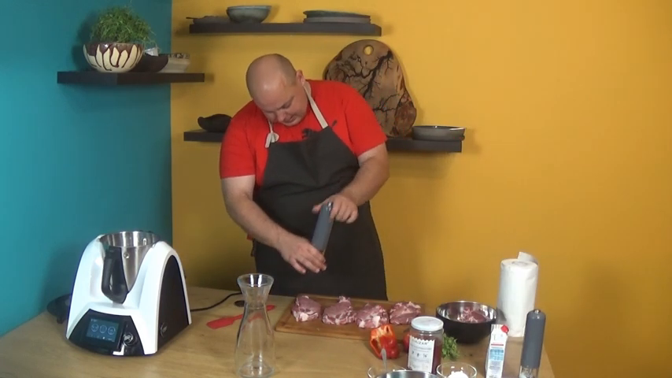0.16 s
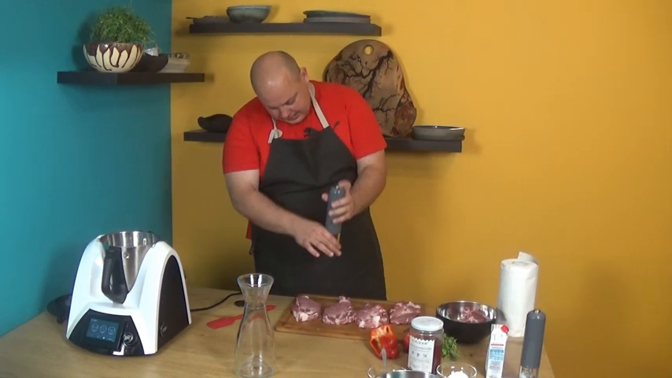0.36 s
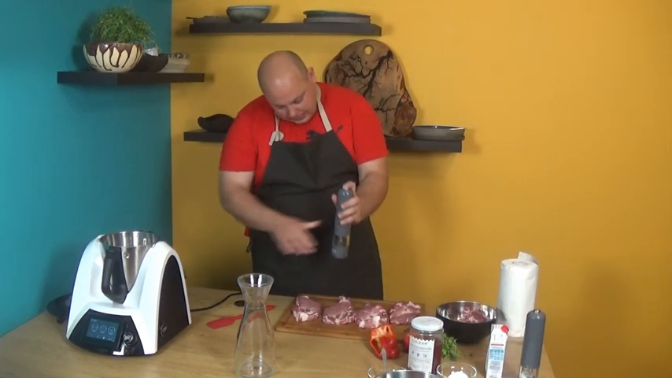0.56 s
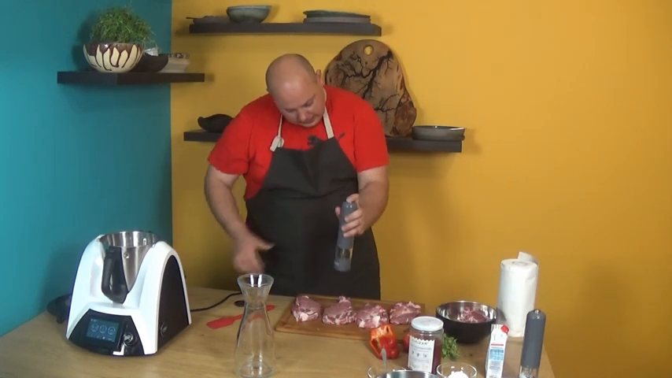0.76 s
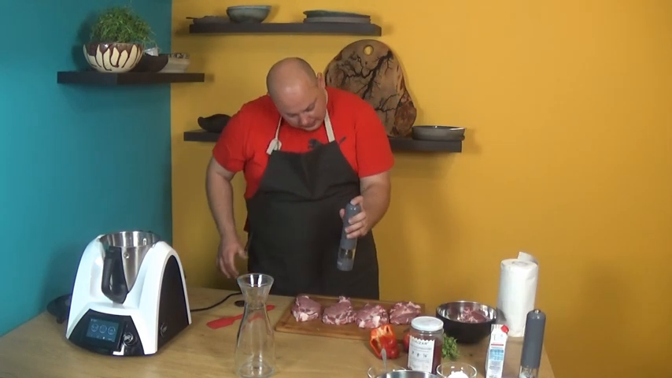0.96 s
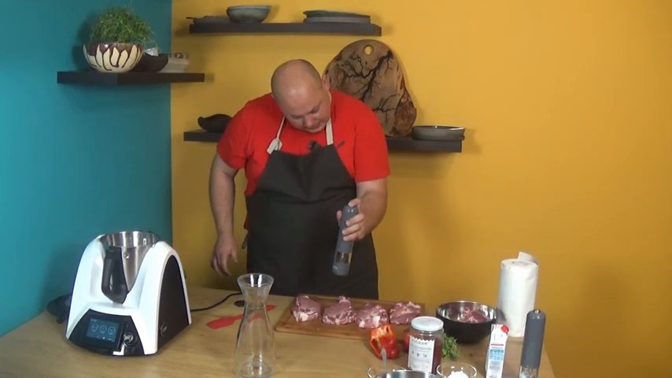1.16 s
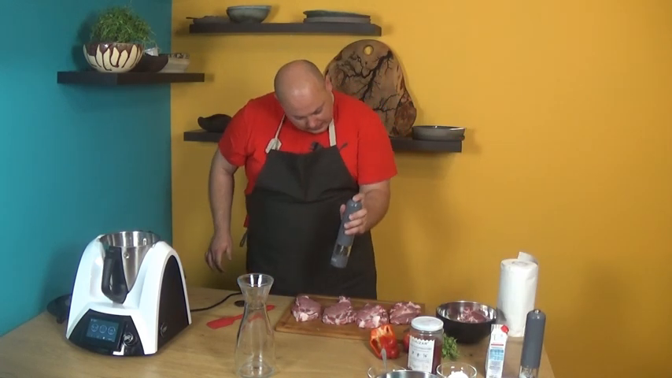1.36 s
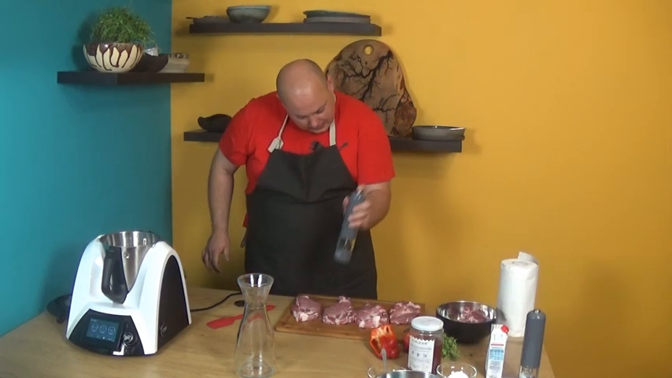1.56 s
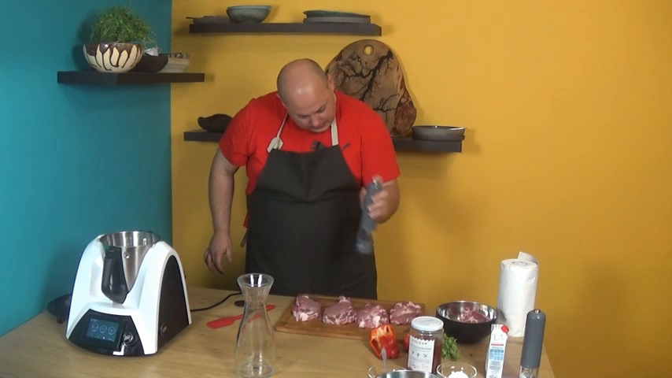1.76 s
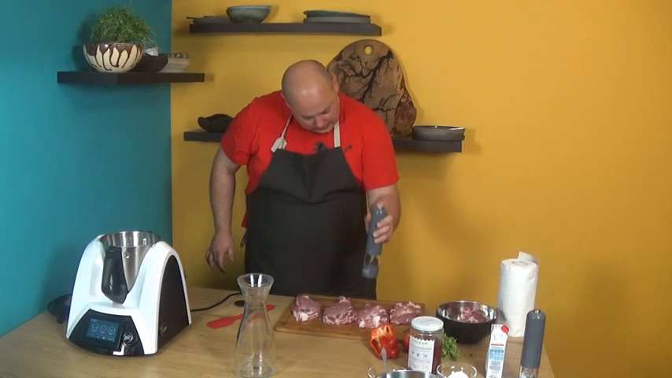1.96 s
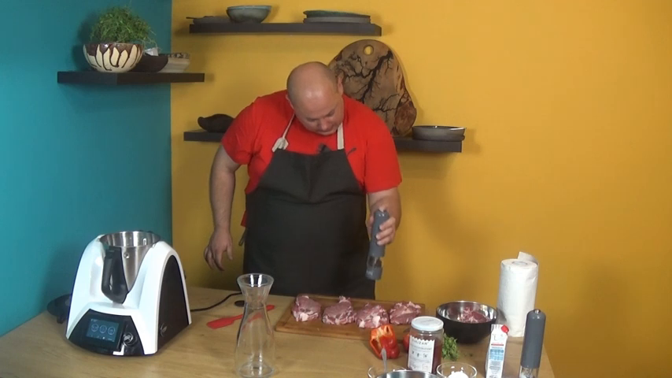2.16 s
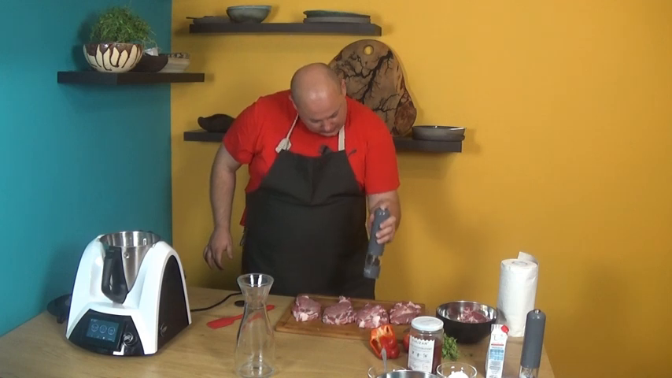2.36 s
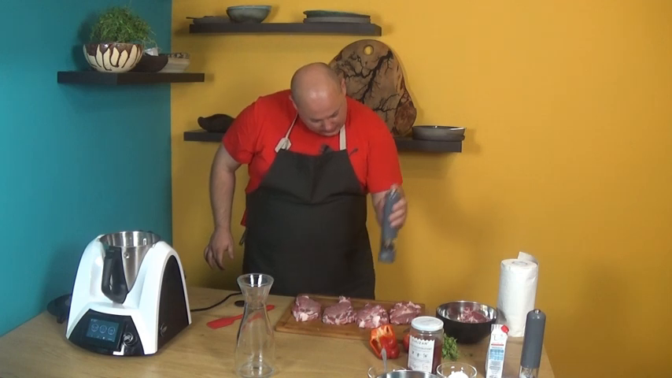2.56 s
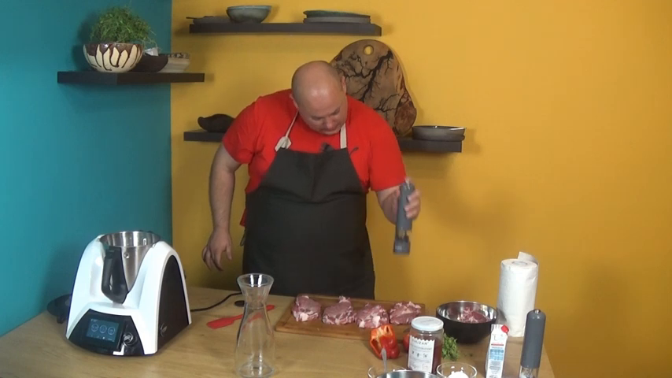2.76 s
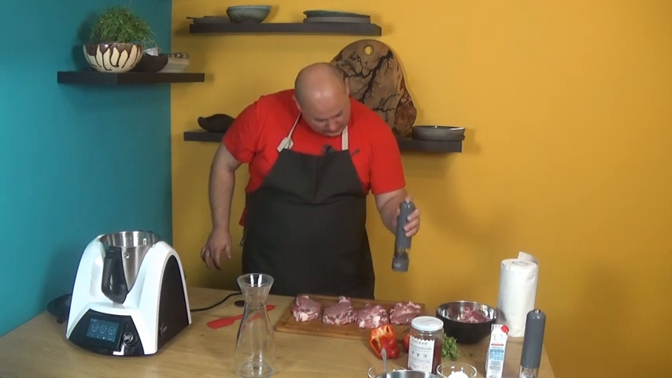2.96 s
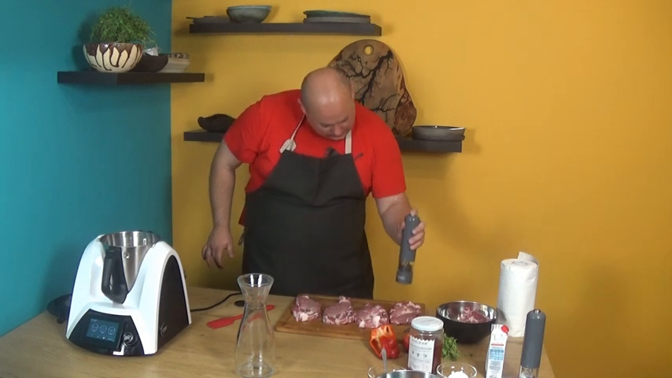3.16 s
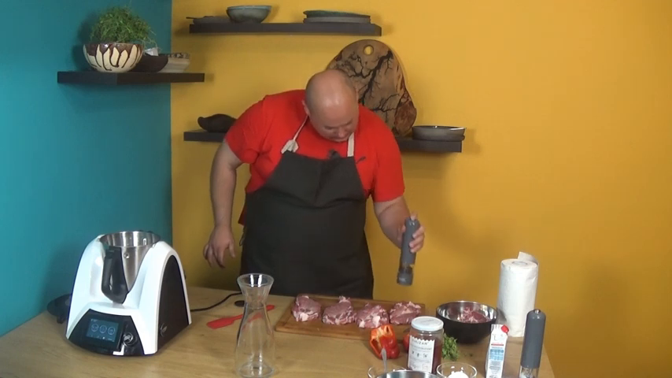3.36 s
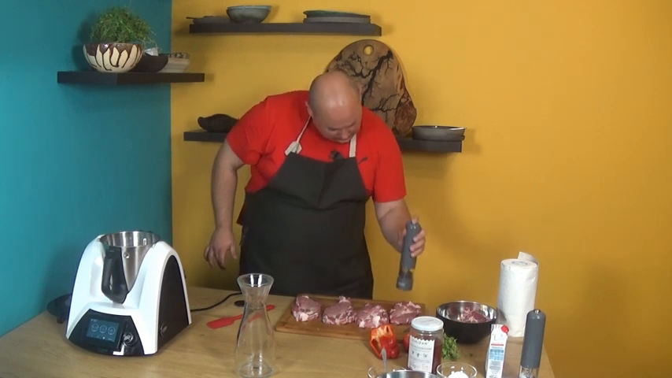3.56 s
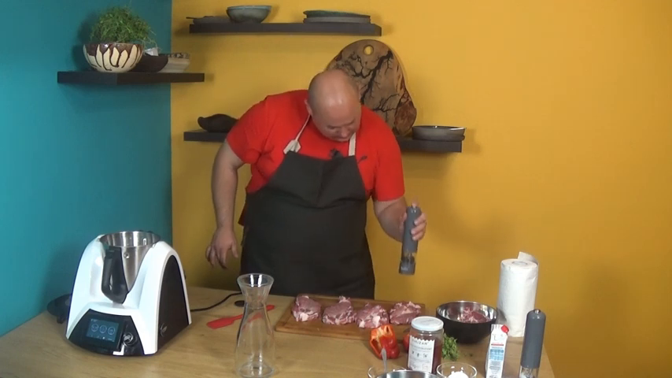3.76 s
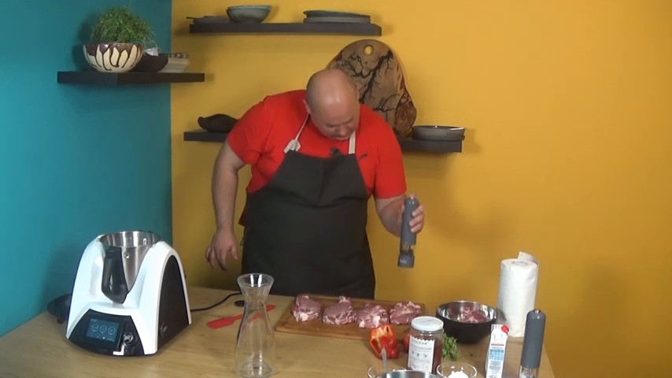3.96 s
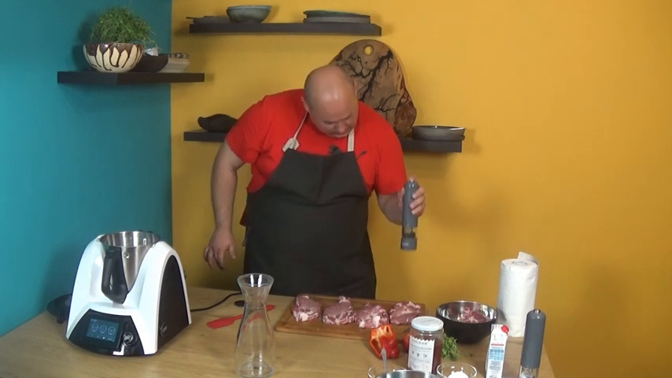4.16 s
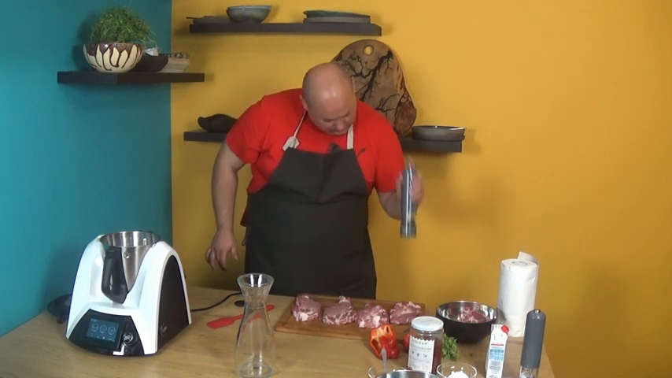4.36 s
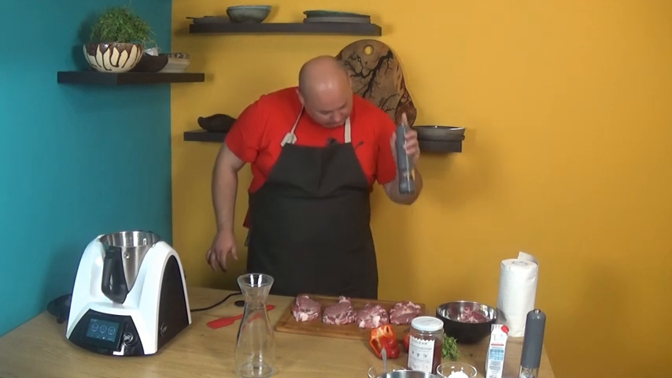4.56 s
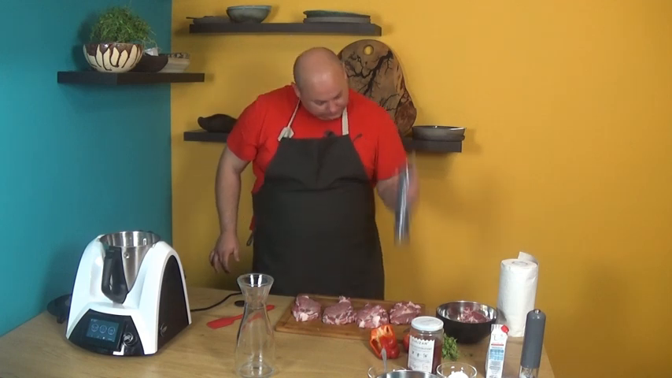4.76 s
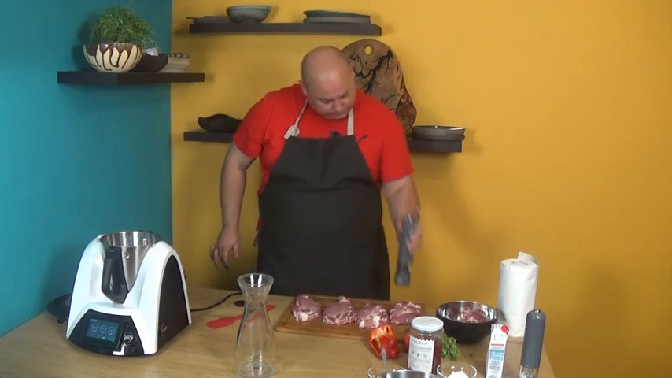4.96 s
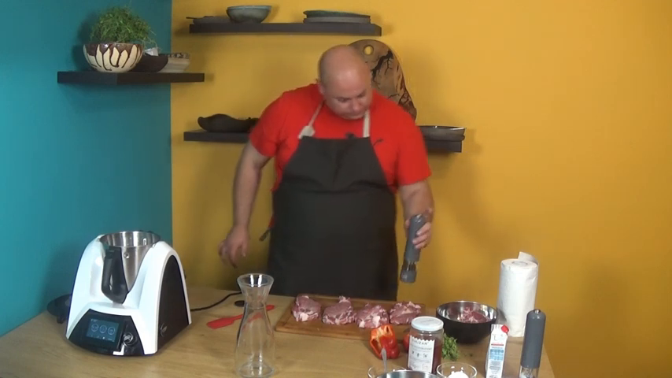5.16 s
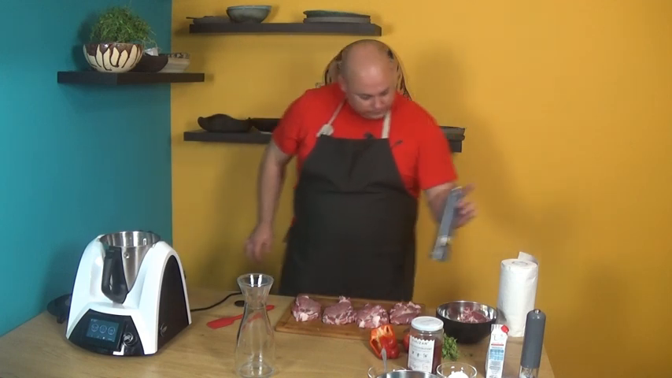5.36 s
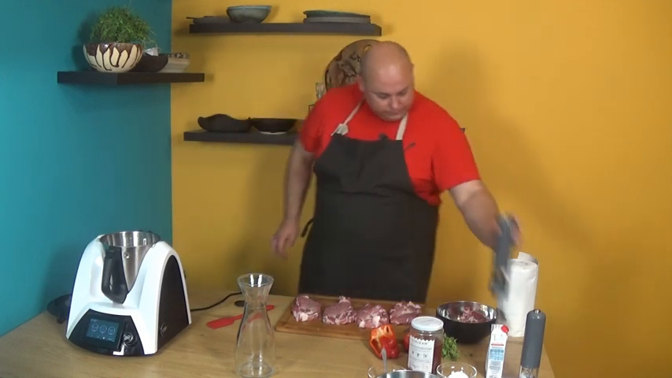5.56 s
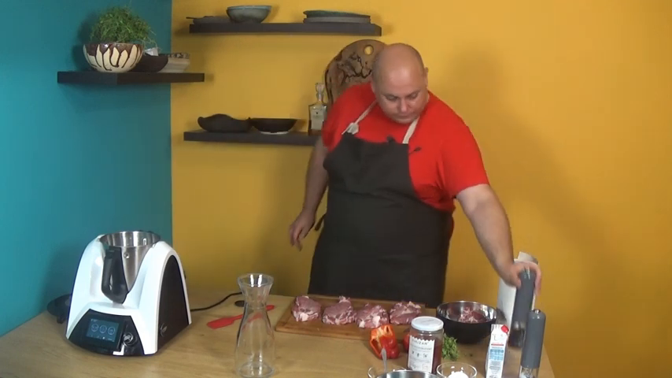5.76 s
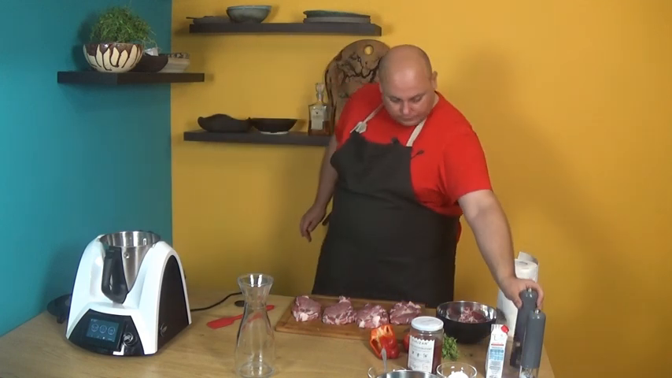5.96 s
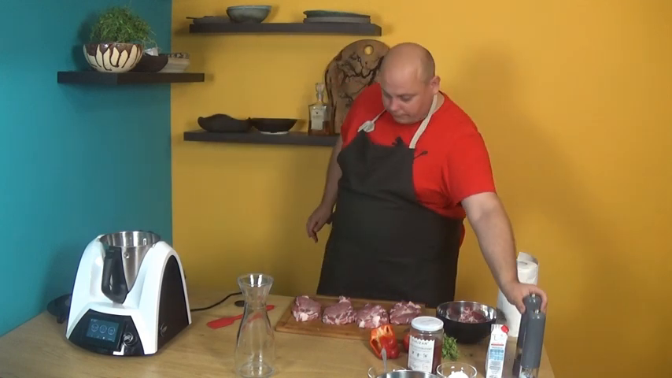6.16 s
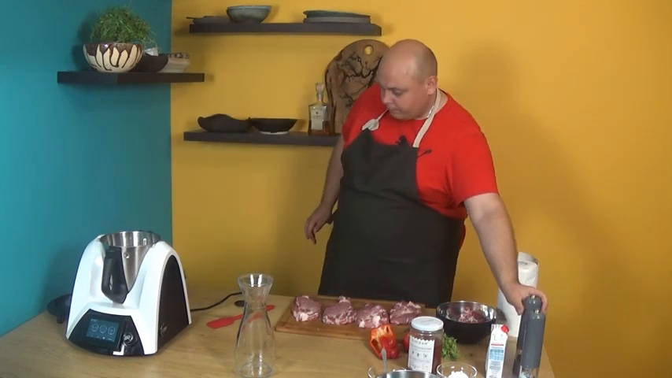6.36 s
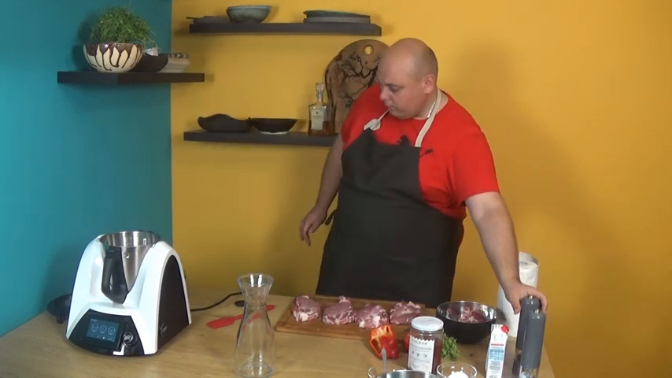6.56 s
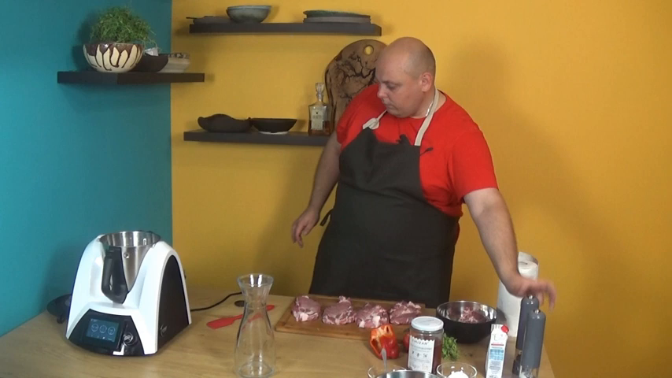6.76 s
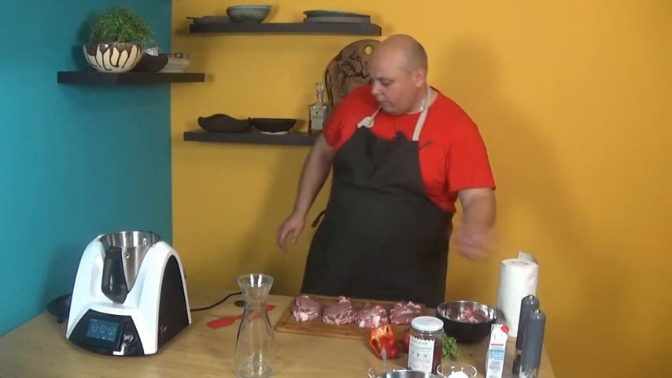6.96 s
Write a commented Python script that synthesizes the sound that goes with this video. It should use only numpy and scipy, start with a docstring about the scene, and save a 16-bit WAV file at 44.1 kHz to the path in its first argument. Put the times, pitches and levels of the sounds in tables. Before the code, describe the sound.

In a kitchen with a short reverberation, an electric spice grinder is heard from a few metres away. It whirs and crunches three times, the last two runs almost joined, with corns snapping in the burrs. Then come a quick rattling shake, several sharp plastic clicks and a knock as the grinder lands on the counter and rocks once. Light handling and one more click close it, over faint hiss.

```python
"""A brief scrape of grit, then a small battery spice mill whines and crunches through three bursts,
over a kitchen counter a few metres from the microphone. Its three-pole motor and pinion sing under the
hiss of corns breaking in the burrs; then it is shaken, clicked and set down. The counter returns early
echoes, the room a short tail; a faint hiss, a thin whistle and a quick tick lie under it all."""
import sys
import numpy as np
from scipy import signal
from scipy.fft import rfft, irfft, next_fast_len
from scipy.io import wavfile
from scipy.ndimage import uniform_filter1d

SR = 44100
rng = np.random.default_rng(int(sys.argv[2]) if len(sys.argv) > 2 else 0)


def unload_wav(signal):
    """Save mono or channel-first audio to the path in sys.argv[1] as 16-bit WAV at rate SR, clipped to [-1, 1]."""
    wavfile.write(
        sys.argv[1],
        SR,
        np.round(np.clip(np.atleast_2d(signal).T, -1, 1) * 32767).astype(np.int16),
    )


N = 312669
T = np.arange(N) / SR
FFT_SIZE = next_fast_len(N + SR)
HZ = np.maximum(np.arange(FFT_SIZE // 2 + 1) * SR / FFT_SIZE, 1)

# The shaft spins up, labours under the corns and runs down: t/s, f/Hz
SHAFT_SPEED = [(0.53, 140), (0.63, 189), (0.69, 225), (0.8, 210), (0.89, 210), (0.95, 224), (1.03, 226),
               (1.07, 240), (1.17, 245), (1.37, 238), (1.42, 199), (1.52, 138), (1.72, 141), (1.81, 195),
               (1.95, 241), (2.0, 256), (2.22, 277), (2.37, 268), (2.52, 194), (2.62, 150), (2.68, 180),
               (2.76, 198), (2.82, 218), (2.93, 216), (3.0, 245), (3.08, 251), (3.17, 247), (3.3, 260),
               (3.4, 244), (3.44, 230), (3.5, 232), (3.58, 251), (3.69, 244), (3.84, 219), (3.92, 231),
               (3.99, 231), (4.05, 211), (4.2, 210), (4.27, 149)]
# Button presses: start t/s, end t/s, then level/dB of poles, pinion, chatter (table levels are relative)
PRESSES = [(0.57, 1.5, -61, -42, -50), (1.69, 2.63, -59.5, -53.5, -51), (2.627, 4.268, -58, -44.5, -50.5)]
# Tones of three poles, eleven teeth and uneven teeth: multiple of the shaft rate, level/dB
POLE_TONES = [(2, -17), (3, 1.5), (6, 2.5)]
PINION_TONES = [(11, -5), (22, 3)]
CHATTER_TONES = [(8, -13.5), (9, -14), (10, -4.5), (14, 2), (15, 5), (17, 3.5), (21, -3.5)]
# Resonances that each set of tones sweeps through: f/Hz, width/Hz, lift/dB
CASING_MODES = [(739.5, 43, 13.5), (774, 63, 8)]
SEAT_MODES = [(2198, 440, 19.2), (2584, 114, 10.7), (2758, 210, 10.7), (2966, 130, 7.4)]
GEARBOX_MODES = [(2260, 64, -4), (2480, 180, -12), (3180, 140, 11), (4700, 180, -10.5)]
def motor(switch_s=0.025, full_hz=243, waver_db=3):
    """Shaft harmonics grow with speed and swell as they cross resonances. Returns whine, shaft angle."""
    shaft_hz = curve(SHAFT_SPEED, 1)
    unsteady_hz = shaft_hz * (1 + 0.003975 * walk(60) + .006 * walk(12))
    angle = 2 * np.pi * np.cumsum(unsteady_hz) / SR
    speed_gain = undb(6 * np.log2(shaft_hz / full_hz))  # 6 dB per octave
    parts = (POLE_TONES, CASING_MODES), (PINION_TONES, SEAT_MODES), (CHATTER_TONES, GEARBOX_MODES)
    whine = 0
    for column, (tones, modes) in enumerate(parts, start=2):
        pressed = sum(undb(row[column]) * (T > row[0]) * (T < row[1]) for row in PRESSES)
        gain = uniform_filter1d(pressed, int(switch_s * SR)) * speed_gain
        for order, db in tones:
            tone_db = db + lift_db(order * shaft_hz, modes) + waver_db * walk(14)
            whine = whine + np.sqrt(2) * gain * undb(tone_db) * np.sin(order * angle)
    return whine, angle


# The opening scrape and the long grind, one list each: t/s, level/dB, extra treble level/dB
GRIND_RUNS = [
    [(0.0, -22, -13), (0.14, -101, 19)],
    [(0.4, -54.5, 0), (0.45, -51.5, -3), (0.5, -33, -8), (0.63, -28.5, 3.5), (0.87, -25, 4), (0.93, -27, 1),
     (1.39, -25.5, 3), (1.46, -30.5, 0), (1.67, -39.5, -13), (1.75, -28.5, -1), (1.93, -27, -3),
     (2.24, -28.5, 0), (2.28, -27.5, 1), (2.58, -35, -6.5), (2.65, -30, -6), (2.72, -25.5, 1.5),
     (2.81, -28.5, 0.5), (2.9, -24, 2.5), (2.97, -28.5, -4), (3.13, -25.5, 0.5), (3.2, -28.5, -0.5),
     (3.42, -23.5, -1.5), (3.56, -27, -0.5), (3.79, -23.5, 0), (3.88, -25, -1), (4.1, -25.5, 3.5),
     (4.25, -26.5, -3), (4.34, -37, -14), (4.42, -72, -11)],
]
# Spectrum of grit in the burrs: f/Hz, level/dB
GRIT_SPECTRUM = [(150, -56), (300, -53), (600, -23.5), (1000, -19.5), (1500, -11.5), (2050, -5.5),
                 (2400, -2), (3370, -1), (4430, -3.5), (6760, -1.5), (7830, -2.5), (9230, 0.5),
                 (11300, -10), (16000, -34)]
# Resonances of the mill's shell: f/Hz, width/Hz, lift/dB
SHELL_MODES = [(1663, 120, 7.5), (2130, 120, 4), (2580, 140, -3), (3530, 76, 5), (5200, 1000, 2.5),
               (6800, 240, 5), (9500, 500, 2.5)]
def burrs(angle, split_hz=7400):
    """Grit, pulsing with the shaft, rings the shell; the treble follows its own level."""
    out = 0
    for side, columns in (("low", [1]), ("high", [1, 2])):
        grit = level(grains(9000, spread_db=4.0), 0)
        pulsing = grit * (1 + 0.21 * np.cos(angle)) * undb(1.5 * walk(34.8))
        crossover = signal.butter(4, split_hz, side, fs=SR, output="sos")
        part = signal.sosfilt(crossover, colour(pulsing, GRIT_SPECTRUM, SHELL_MODES))
        envelope = sum(undb(sum(curve(run, c, outside=-104) for c in columns)) for run in GRIND_RUNS)
        out = out + level(part, -4.5) * envelope
    return out


# Corns breaking in the burrs: t/s, crunch level/dB, knock level/dB
CORN_CRACKS = [(0.5073, -23, -78), (0.889, -18, -37), (1.1294, -25, -53), (1.3932, -30, -39),
               (1.4798, -13.5, -58), (1.759, -21, -57), (1.9114, -12, -40), (2.7244, -11, -39),
               (2.7824, -14, -30), (2.9097, -14.5, -61), (3.1447, -11.5, -45.5), (3.2485, -15.5, -38.5),
               (3.6012, -10.5, -42), (3.9383, -15.5, -47)]
def cracking_corns():
    """Each corn breaks with a wide crunch and knocks the shell."""
    out = np.zeros(N)
    for (s, db, knock_db), noise in zip(CORN_CRACKS, rng.standard_normal((len(CORN_CRACKS), 2, 4000))):
        crunch = burst(noise[0], hz=3340, width=5100, decay_s=0.0058, db=db - 7.5)
        knock = burst(noise[1], hz=777, width=390, decay_s=0.0029, db=knock_db)
        add(out, s, crunch + knock)
    return out


# The shell sings as the grip changes: t/s, length/s, f/Hz, level/dB
SINGING_SPELLS = [(0.634, 0.12, 2160, -50), (0.66, 0.55, 2430, -38.5), (0.792, 0.075, 4830, -32),
                  (0.95, 0.45, 3390, -40), (1.27, 0.063, 5200, -30), (.9, .35, 5300, -39),
                  (1.789, 0.11, 5230, -37.5), (1.804, 0.84, 2150, -44), (2.28, .1, 5200, -47),
                  (2.714, .37, 2212, -40.5), (2.772, 0.11, 3395, -35), (3.36, .12, 3360, -41),
                  (3.7, 0.28, 3330, -42), (3.702, 0.15, 2416, -38), (4.054, 0.21, 2187, -53)]
def singing_shell(waver_db=1.5):
    """Chatter excites narrow modes of the shell; each spell swells and fades."""
    out = 0
    for s, length, hz, db in SINGING_SPELLS:
        tone = double_band(rng.standard_normal(N), hz, width=.024 * hz)
        progress = np.clip((T - s) / length, 0, 1)
        swell = np.sqrt(np.sin(np.pi * progress).clip(0))
        out = out + level(tone, db) * swell * undb(waver_db * walk(12))
    return out


# Flicks of the wrist: peak t/s, level/dB, rise/(dB/s), fall/(dB/s)
FLICKS = [(4.662, -38, 222, 207), (4.728, -27, 612, 700), (4.756, -38, 1500, 500), (4.904, -31.5, 184, 159),
          (5.19, -63, 100, 200), (5.68, -60, 136, 208)]
# Spectrum of the loose corns: f/Hz, level/dB
RATTLE_SPECTRUM = [(150, -69), (250, -47), (429, -21.5), (890, -39), (1700, -17), (2090, -16.5),
                   (2360, -8.5), (2670, -4.5), (4650, -8.5), (5730, -2), (7310, -7), (9660, 1.5),
                   (16000, -29)]
def shaken_corns():
    """Each flick throws the corns against the hollow store."""
    throws = sum(undb(db - np.where(T < s, rise * (s - T), fall * (T - s)))
                 for s, db, rise, fall in FLICKS)
    rattle = colour(grains(4000, spread_db=5.5), RATTLE_SPECTRUM)
    return level(rattle, 0) * throws


# Soft bumps, and two sharp clicks near the end: t/s, level/dB, f/Hz, decay/s
HANDLING_NOISES = [(0.224, -38, 1350, 0.012), (.384, -39, 1290, 0.008), (.463, -28, 3000, 0.021),
                   (4.73, -32, 2400, 0.013), (4.864, -25.5, 2800, 0.015), (5.012, -41, 630, 0.0092),
                   (5.539, -41, 520, 0.0071), (6.413, -42, 557, 0.0089), (6.443, -50, 573, 0.0064),
                   (6.696, -42, 2660, 0.011), (6.73, -50, 2370, .006), (6.907, -35, 2440, 0.0036),
                   (6.967, -34.5, 9500, .004), (6.99, -19.5, 4700, 0.0026), (6.992, -37.5, 1770, 0.032),
                   (7.034, -34, 2900, 0.0076)]
def handling():
    """Small handling noises, each a quickly dying band of noise."""
    out = np.zeros(N)
    for s, db, hz, decay_s in HANDLING_NOISES:
        add(out, s, burst(rng.standard_normal(4000), hz, 0.79 * hz, decay_s, db - 12.5))
    return out


# Sharp clicks of the mill in the hand: t/s, level/dB, tilt/(dB/octave)
PLASTIC_CLICKS = [(0.205, -42, 8), (0.2194, -40, -4), (4.7557, -13.5, 4), (5.2143, -9, -1),
                  (5.2689, -11.5, -1), (5.316, -17.5, -2.5), (5.707, -8, 1.5), (6.9925, -36, -7)]
# Spectrum of a click before its tilt: f/Hz, level/dB
SNAP_SPECTRUM = [(240, -46), (400, -25), (1270, -21), (1730, -12), (2400, -12.5), (3990, -4), (5350, 0),
                 (9920, -10), (14800, -20), (16000, -22)]
def clicks(sweep_s=.0012, buzz_db=-12, buzz_s=0.004):
    """Bending waves in the plastic spread each blow into a falling sweep; loose parts buzz on."""
    out, t = np.zeros(N), T[:1000]
    sweep = signal.chirp(t, 17000, sweep_s, 500) * (t < sweep_s)
    for s, db, tilt_db in PLASTIC_CLICKS:
        buzz = undb(buzz_db) * rng.standard_normal(len(t)) * np.exp(-t / buzz_s)
        spectrum = [(hz, snap_db + tilt_db * np.log2(hz / 6000)) for hz, snap_db in SNAP_SPECTRUM]
        snap = colour(sweep + buzz, spectrum, modes=[(8760, 3700, 7.4)])[:len(t)]
        add(out, s, undb(db) * snap / abs(snap).max())
    return out


# The mill lands on the counter and rocks once: t/s, level/dB
LANDINGS = [(6.089, -10), (6.121, -15)]
# Modes of the counter's board: f/Hz, level/dB, t60/s
COUNTER_MODES = [(454, -4, 0.15), (540, -4.5, 0.23), (640, -1, 0.11), (722, -6, 0.091), (840, -14, .1),
                 (1050, -8, 0.088), (1650, -15.5, .08), (2130, -5, 0.073), (2900, -9, 0.087)]
# Spectrum of the thud: f/Hz, level/dB
THUD_SPECTRUM = [(59, -89), (100, -19), (367, -17), (703, 0.5), (1050, -9.5), (1110, -22), (1370, -6.5),
                 (2180, -5.5), (4840, -23), (9660, -58), (15000, -62)]
def set_down(ring_up_s=0.0038):
    """The mill's base strikes the counter: a crack, a short thud and the ringing board."""
    out, t = np.zeros(N), T[:SR // 2]
    modes = sum(undb(db - 60 * t / t60) * np.sin(2 * np.pi * hz * t) for hz, db, t60 in COUNTER_MODES)
    ring = undb(-21.5) * modes * (1 - np.exp(-t / ring_up_s))
    crack = undb(19) * (t == 0)
    for hz, width in (3900, 6100), (3100, 5700), (2900, 6000):
        crack = band(crack, hz, width)
    for s, db in LANDINGS:
        blow = rng.standard_normal(len(t)) * np.exp(-t / 0.003)
        thud = level(colour(blow, THUD_SPECTRUM)[:len(t)], -30.0)
        add(out, s + .001, undb(db) * (ring + thud + crack))
    return out


# The kitchen's reverberation: f/Hz, t60/s, level/dB, share alike left and right
KITCHEN_DECAY = [(125, 0.75, 7, 0.9), (470, 0.32, 7.5, 0.94), (2000, 0.35, 4.5, 0.86),
                 (5650, 0.37, 0.5, 0.67), (7700, 0.37, -3.5, 1), (11400, .3, 3.5, 1),
                 (12900, 0.073, -3.5, 0.02)]
def room_tail():
    """A diffuse stereo response of unit energy, in third octaves; the bass rings longest."""
    t, out = T[:SR // 2], 0
    table_hz, *columns = np.transpose(KITCHEN_DECAY)
    for hz in 90 * 2 ** np.arange(0, 7.6, 1 / 3):
        t60, db, alike = (np.interp(np.log(hz), np.log(table_hz), column) for column in columns)
        shared = np.sqrt(alike) * rng.standard_normal(len(t))
        separate = np.sqrt(1 - alike) * rng.standard_normal((2, len(t)))
        out = out + double_band(shared + separate, hz, hz / 3) * undb(db - 60 * t / t60)
    out = out * (1 - np.exp(-t / 0.00067))
    return out / np.sqrt(np.sum(out ** 2) / 2)


# Straight path past the hand to the microphone: f/Hz, level/dB
DIRECT_PATH = [(300, -6), (2000, -8.5), (6000, -5), (8800, 1.5), (11000, 2), (15000, -9)]
# Reflections off the counter: delay t/s, level/dB
COUNTER_ECHOES = [(.0033, -3), (.0076, -7)]
def kitchen(dry, places=8, move_s=.08, tail_db=1):
    """Heard from a few metres: direct sound, two echoes and a tail that changes as the hand moves."""
    out = np.array([colour(dry, DIRECT_PATH)] * 2)
    for s, db in COUNTER_ECHOES:
        lag = int(s * SR)
        out[:, lag:] += undb(db) * dry[:-lag]
    for place in range(places):
        away = abs((T / move_s - place + places / 2) % places - places / 2)
        share = np.cos(np.pi / 2 * np.minimum(away, 1))  # equal-power fade from place to place
        out += undb(tail_db) * signal.fftconvolve((dry * share)[None], room_tail(), axes=1)[:, :N]
    return out


# Hiss at the microphone, and its side signal against its mid: f/Hz, level/dB
HISS_SPECTRUM = [(8.8, -67), (15, -27), (84, -15), (112, -12.5), (179, -8.5), (312, 1), (559, 5), (726, 4),
                 (1900, 2.5), (2470, 2.5), (4840, -3), (9740, -3), (11000, -7.5), (16000, -12)]
SIDE_SPECTRUM = [(30, -1), (125, -10), (1000, -2.5), (6000, -7), (9000, -38), (13000, -27)]
# Thin whistles: f/Hz, width/Hz, level/dB
WHISTLES = [(9800, 37, -79), (7800, 40, -85), (570, 21, -86)]
# Hiss and whistles sink near the end: t/s, level/dB
ROOM_TONE_LEVEL = [(0, 5.5), (5.5, 6), (6.05, 3.5), (6.5, -1), (7.09, 0)]
def room_tone(hiss_db=-61):
    """Faint hiss, partly alike left and right, with narrow wavering tones."""
    mid, side = rng.standard_normal((2, N))
    stereo = mid + colour(side, SIDE_SPECTRUM) * np.array([[1], [-1]])
    out = level(colour(stereo, HISS_SPECTRUM), hiss_db)
    for hz, width, db in WHISTLES:
        out = out + level(double_band(rng.standard_normal(N), hz, width), db)
    return out * undb(curve(ROOM_TONE_LEVEL, 1))


# Faint ticking, centred between left and right: start t/s, end t/s, f/Hz, level/dB
TICK_RUNS = [(.025, 5.72, 2090, -49), (5.738, 7.09, 2570, -54)]
def ticking(period_s=.03995):
    """Tiny pings, about 25 a second, slightly uneven in level."""
    out, t = np.zeros(N), T[:600]
    for start, end, hz, db in TICK_RUNS:
        ping = np.sin(2 * np.pi * hz * t) * t / 0.0029 * np.exp(1 - t / 0.0019)
        for s in np.arange(start, end, period_s):
            add(out, s, undb(db + 1.4 * rng.standard_normal()) * ping)
    return out


def undb(db):
    return 10 ** (np.asarray(db) / 20)


def level(x, db):
    """Scale x to an RMS level."""
    return x * undb(db) / np.sqrt(np.mean(x ** 2))


def curve(rows, column, outside=None):
    """One column of a timed table, interpolated at every sample."""
    rows = np.array(rows)
    return np.interp(T, rows[:, 0], rows[:, column], outside, outside)


def lift_db(hz, modes):
    """Summed lift of resonance peaks at hz."""
    return sum(db / (1 + (2 * (hz - centre) / width) ** 2) for centre, width, db in modes)


def colour(x, spectrum, modes=()):
    """Causal filter with the given spectrum and resonances, from the folded cepstrum."""
    hz, db = np.transpose(spectrum)
    response_db = np.interp(np.log(HZ), np.log(hz), db) + lift_db(HZ, modes)
    cepstrum = irfft(np.log(undb(response_db)), FFT_SIZE)
    cepstrum[1:FFT_SIZE // 2] *= 2
    cepstrum[FFT_SIZE // 2 + 1:] = 0
    return irfft(rfft(x, FFT_SIZE) * np.exp(rfft(cepstrum)), FFT_SIZE)[..., :N]


def band(x, hz, width):
    """Two-pole resonance, gain 1 at the centre."""
    return signal.lfilter(*signal.iirpeak(min(hz, .45 * SR), hz / width, fs=SR), x)


def double_band(x, hz, width):
    return band(band(x, hz, width), hz, width)


def burst(noise, hz, width, decay_s, db):
    """A band of noise with a fast attack and an exponential decay."""
    t = T[:len(noise)]
    return level(double_band(noise, hz, width), db) * np.exp(-t / decay_s) * (1 - np.exp(-t / 0.00047))


def walk(rate):
    """Random levels held 1 / rate s and slewed; spread near 1."""
    hold = int(SR / rate)
    steps = np.repeat(rng.standard_normal(N // hold + 1), hold)
    return 1.158 * uniform_filter1d(steps, hold)[:N]


def grains(rate, spread_db):
    """Random impulses, about rate a second, a few larger than the rest."""
    size_db = spread_db * np.minimum(rng.exponential(size=N), 3.5)
    return (rng.random(N) < rate / SR) * np.sign(rng.standard_normal(N)) * undb(size_db)


def add(out, s, sound):
    start = int(s * SR)
    out[start:start + len(sound)] += sound[:N - start]


def scene():
    """The mill in the kitchen, as it reaches the microphone."""
    whine, angle = motor()
    mill = undb(-11.0) * whine + burrs(angle) + singing_shell() + cracking_corns()
    mill = mill + shaken_corns() + handling() + clicks() + set_down()
    # a low cut at 260 Hz keeps the mill free of rumble
    mill = signal.sosfilt(signal.butter(2, 260, "high", fs=SR, output="sos"), mill)
    # part of the whine is added dry, keeping its tone firm and steady
    return kitchen(mill) + undb(-4.5) * whine + room_tone() + ticking()


def record(dry):
    """The recorder cuts steeply above 15.9 kHz."""
    return signal.sosfilt(signal.ellip(10, .2, 70, 15900, fs=SR, output="sos"), dry)


dry = scene()
out = record(dry)
unload_wav(out)
```